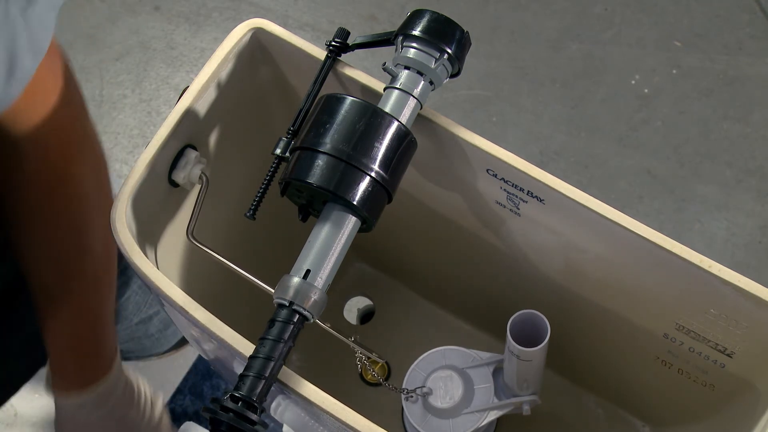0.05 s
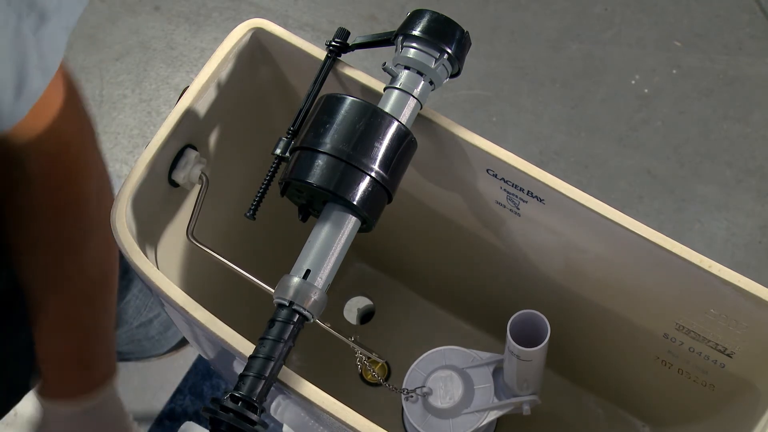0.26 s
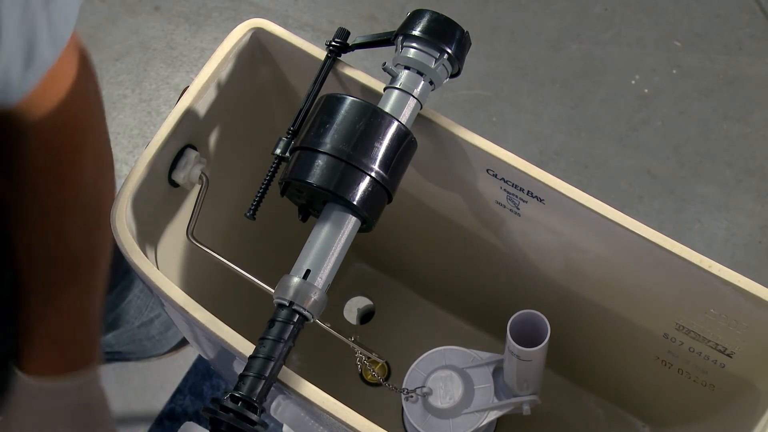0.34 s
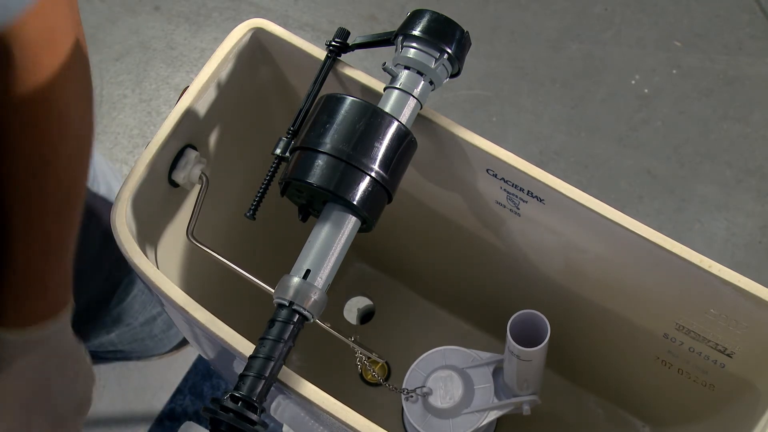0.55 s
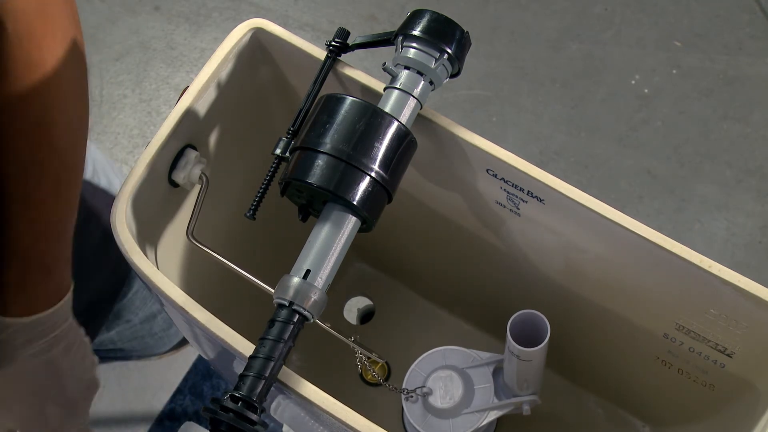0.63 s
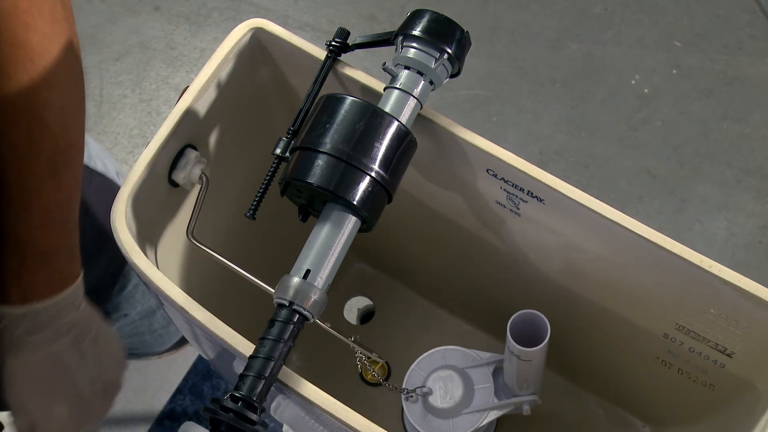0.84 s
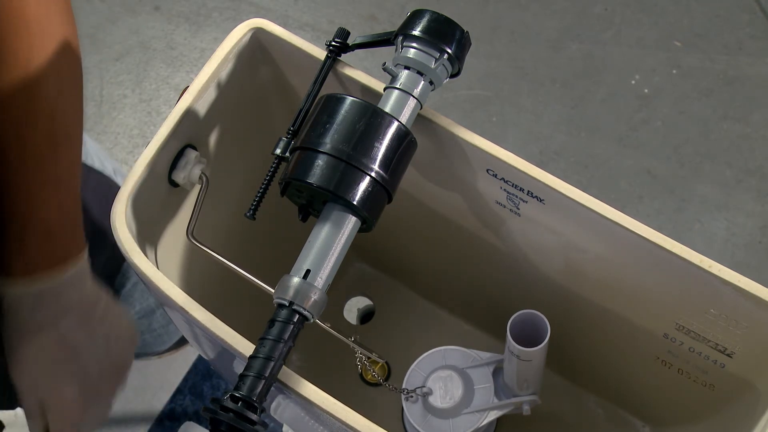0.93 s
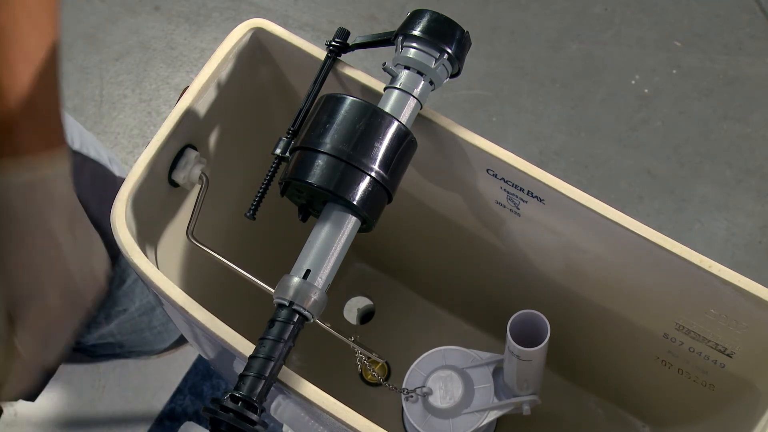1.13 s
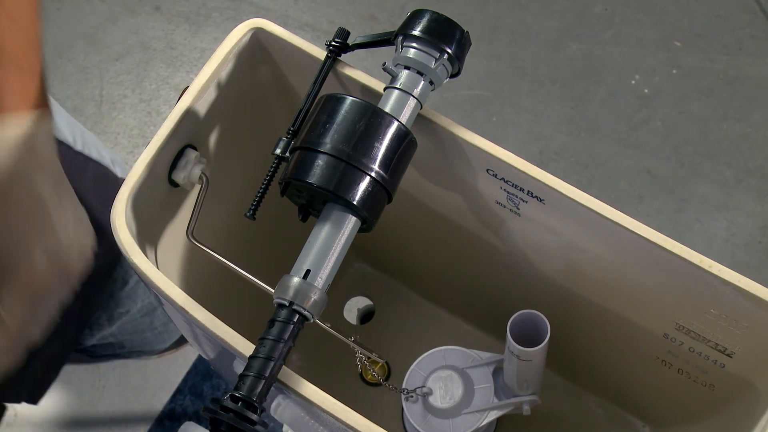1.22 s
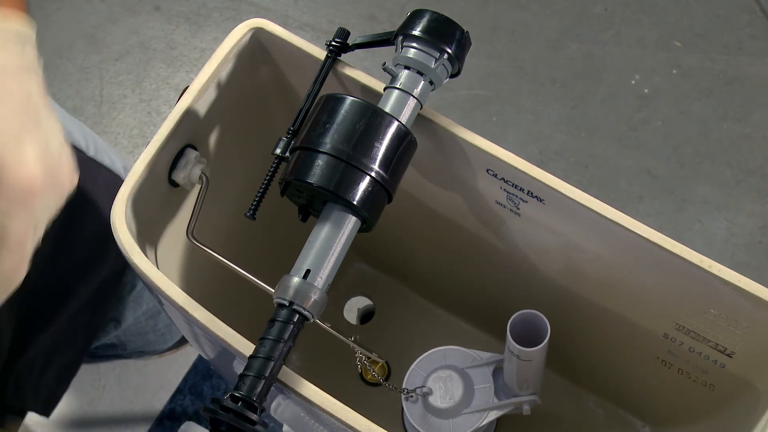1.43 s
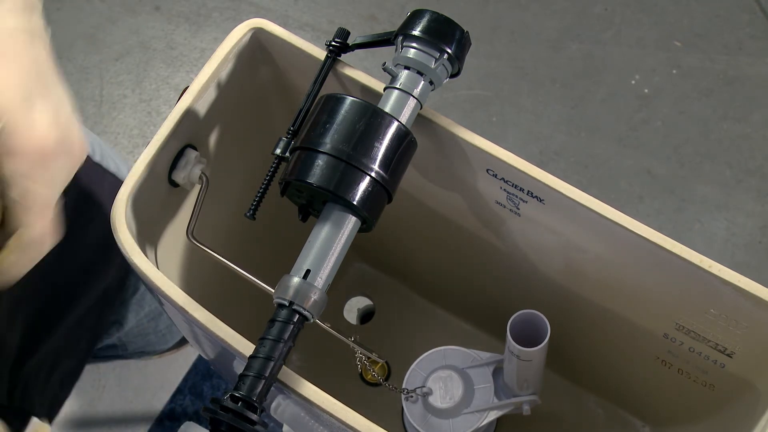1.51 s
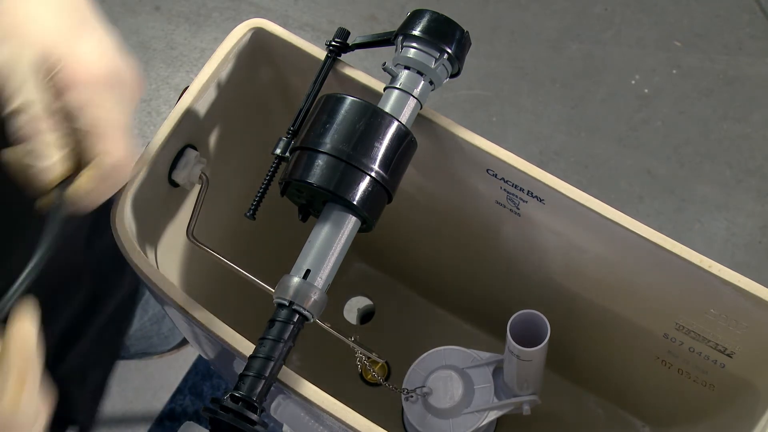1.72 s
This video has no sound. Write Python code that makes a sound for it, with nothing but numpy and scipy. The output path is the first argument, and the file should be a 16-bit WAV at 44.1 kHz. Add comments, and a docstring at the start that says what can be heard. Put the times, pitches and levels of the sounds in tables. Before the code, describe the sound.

A heavy toilet tank lid clunks onto a concrete floor and chatters briefly to rest.

```python
"""A faint shuffle over a low hum, then a heavy, hard piece, probably the lid, meets the concrete floor
beside an open toilet tank. One edge lands, the other follows with a clunk, and it chatters to rest.
Each contact sounds the hollow body, the hard shell and the grit beneath; the body rings briefly in the
workshop. Then a sleeve rustles and a few small taps reach the one microphone, with a faint high
chirping far off."""
import sys
import numpy as np
from scipy import signal
from scipy.fft import rfft, irfft
from scipy.io import wavfile

SR = 44100
rng = np.random.default_rng(int(sys.argv[2]) if len(sys.argv) > 2 else 0)


def to_wav(s):
    """Save 16-bit WAV."""
    ch = np.atleast_2d(s).T  # columns
    pcm = np.round(np.clip(ch, -1, 1) * 32767)  # PCM
    wavfile.write(sys.argv[1], SR, pcm.astype(np.int16))


N = 77175
TIME = np.arange(N) / SR

# colour of the room air: f/Hz, level/dB
AIR_COLOUR = [(15, -11), (26, -8), (36, 13.5), (55, 5), (110, 4.5), (182, -3.5), (277, -7.5), (485, -13),
              (740, -12), (1220, -22.5), (1760, -22), (2750, -50), (11100, -59), (16000, -49)]
# tones of the hum: f/Hz, level/dB
HUM_TONES = [(86.1, -71), (118.4, -67), (176.5, -68), (235.5, -74)]
# hiss of the sleeve: t/s, level/dB
SLEEVE_ENVELOPE = [(0, -67), (.2, -70.5), (.72, -71), (.85, -66.5), (1.1, -67.5), (1.3, -68), (1.5, -65),
                   (1.62, -67), (1.75, -68.5)]
# its colour: f/Hz, level/dB
SLEEVE_COLOUR = [(1000, 3.5), (3000, 5.5), (6000, 4), (11000, 8), (16000, -2)]
# the person shifts: t/s, level/dB
SHUFFLE_ENVELOPE = [(0, -52), (.11, -55), (.17, -66), (.25, -100), (1.0, -75.5), (1.35, -89), (1.55, -66),
                    (1.75, -93)]
# its colour: f/Hz, level/dB
SHUFFLE_COLOUR = [(120, 9.5), (300, -2), (500, 4.5), (850, 3), (1300, -10), (3000, -17.5), (8000, -25)]
# the arm draws back along the clothes: t/s, level/dB
RUB_ENVELOPE = [(0, -78.5), (1.38, -72), (1.5, -64.5), (1.62, -65.5), (1.75, -68.5)]
# its colour: f/Hz, level/dB
RUB_COLOUR = [(500, -1), (1000, 11.5), (1800, 9.5), (3500, 4.5), (7000, 0.5), (14000, -58)]
# scuffs and ticks of handling: t/s, level/dB, centre f/Hz, width/octaves, t60/s
SCUFFS = [(0.108, -50.5, 795, 0.5, 0.035), (0.8301, -45.5, 6040, 0.74, 0.0044),
          (0.838, -62, 7000, .8, 0.0045), (1.0764, -48, 4380, 0.33, 0.012), (1.076, -56, 1390, 0.43, 0.036),
          (1.0767, -54.5, 447, 0.32, 0.032), (1.138, -60, 1260, 1.33, 0.11),
          (1.2885, -44, 9300, 0.78, 0.0046), (1.4837, -43, 9400, 1, 0.0053),
          (1.6500, -49.5, 2020, 0.38, .03), (1.6735, -49, 2400, .7, 0.0041)]
# the lid meets the floor: t/s, hollow thud/dB, shell clink/dB, hard clack/dB, gritty tick/dB
FLOOR_CONTACTS = [(0.2373, -17.5, -17, -61, -29), (0.2467, -23.5, -31.5, -31.5, -28.5),
                  (0.2557, -44, -28, -25, -50), (0.2580, -32.5, -33, -27.5, -34),
                  (0.2643, -39, -27, -36, -46), (0.2796, -23, -23, -15, -21.5),
                  (0.2827, -15.5, -25, -31, -30), (0.2867, -13, -23.5, -34, -44),
                  (0.3035, -39, -34, -32, -14.5), (0.3053, -27, -31, -55, -21.5),
                  (0.308, -27, -25.5, -42, -30), (0.3333, -35.5, -22.5, -34, -55),
                  (0.3363, -42, -37, -51, -31.5), (0.3602, -30, -45, -35, -33),
                  (0.41, -48, -54, -48, -35.5), (0.422, -57, -61, -60, -50), (0.452, -34, -43.5, -41, -50),
                  (0.5520, -56.5, -76, -52.5, -45), (0.5976, -56.5, -77, -71, -44.5)]
# broad resonances of the hollow body: f/Hz, level/dB, t60/s
THUD_MODES = [(216.7, -18, 0.1), (452, -7, 0.03), (582, -15.5, 0.086), (624, 1.5, 0.018),
              (826, -15.5, 0.06)]
# bright modes of the hard shell: f/Hz, level/dB, t60/s
SHELL_MODES = [(1700, -30.5, 0.03), (1680, -19.5, 0.051), (1730, -24, 0.2), (1880, -27.5, 0.048),
               (2604, -18.5, 0.038), (2930, -18.5, 0.025), (3090, -21.5, 0.013), (4100, -29, 0.03)]
# colour of the clack on concrete: f/Hz, level/dB
CLACK_COLOUR = [(700, -7.5), (1150, 6), (1700, 5.5), (2250, -1.5), (2900, 3.5), (4300, 1), (6000, -10.5),
                (10000, -17.5), (16000, -27)]
# colour of the grit's tick: f/Hz, level/dB
GRIT_COLOUR = [(1500, 6), (3000, -2), (4800, 4), (6700, 0.5), (7900, -9.5), (9700, -7.5), (12500, -13.5),
               (16000, -36)]
# narrow modes of the tank's cavity and walls, ringing on in sympathy: f/Hz, level/dB, t60/s
RING_MODES = [(130, -40.5, 1), (204.4, -35, 0.97), (289, -35, 0.2), (315, -28, 0.57), (346.3, -30, 0.64),
              (437.5, -23, 0.6), (503, -32.5, 0.36), (529.8, -25.5, .45), (550, -37, 0.182),
              (596, -42.5, 0.55), (651.4, -28.5, 0.26), (686, -38, 0.8), (760, -37, 0.43), (853, -40, .4)]
# reverberation of the workshop: f/Hz, level/dB, t60/s
ROOM_DECAY = [(70, 0, 0.52), (128, 1, 1), (253, -1, 0.68), (409, -1, 0.56), (680, -5, 0.31),
              (1114, -3.5, 0.5), (2050, -12.5, .42), (4440, -19.5, 0.87), (9000, -17, 0.9),
              (15100, -14, 0.28)]
# light knocks of one pitch: t/s, level/dB, f/Hz, t60/s
LIGHT_KNOCKS = [(0.315, -28.5, 111.7, 0.077), (1.0765, -50, 4400, 0.017), (1.155, -53.5, 525, 0.042),
                (1.290, -40.5, 222, 0.032), (1.651, -38, 2080, 0.012), (1.6565, -47, 2500, 0.011)]
# distant chirps: t/s, length/s, start f/Hz, end f/Hz
FAR_CHIRPS = [(0.955, 0.043, 4450, 4620), (1.021, 0.072, 4480, 4200), (1.091, 0.047, 4650, 4180)]


def from_db(db):
    """Decibels to gain."""
    return 10 ** (np.asarray(db) / 20)


def rms_one(x):
    """Scale to unit power."""
    return x / np.sqrt(np.mean(x ** 2) + 1e-20)


def at_hz(points, hz, column=1):
    """Read a column of a table on a log-frequency axis."""
    table = np.array(points)
    return np.interp(np.log(np.maximum(hz, 1)), np.log(table[:, 0]), table[:, column])


def noise(colour, size=N):
    """Noise of a given colour, unit power."""
    hz = np.arange(size // 2 + 1) * SR / size
    phases = np.exp(2j * np.pi * rng.random(len(hz)))
    return rms_one(irfft(from_db(at_hz(colour, hz)) * phases, size))


def drift(hz):
    """Random wander of unit power, mostly slower than hz."""
    return noise([(hz, 0), (hz * 10, -60)])


def dying(t60, size=N):
    """Exponential decay, 60 dB down after t60 seconds."""
    return np.exp(-np.log(1000) * TIME[:size] / max(t60, 1e-4))


def add(out, s, sound):
    """Mix a sound in at s seconds."""
    i = max(int(s * SR), 0)
    out[i:i + len(sound)] += sound[:max(N - i, 0)]


def filtered(x, kind, hz, order):
    """Butterworth filter."""
    return signal.sosfilt(signal.butter(order, hz, kind, fs=SR, output="sos"), x)


def modes(table):
    """Decaying sines set off by one blow."""
    return sum(from_db(db) * dying(t60) * np.sin(2 * np.pi * hz * TIME) for hz, db, t60 in table)


def room_tone(air_db=-60, waver_rad=0.17):
    """Low room air and a hum whose tones waver in phase."""
    out = from_db(air_db) * noise(AIR_COLOUR)
    for hz, db in HUM_TONES:
        out += from_db(db) * np.sqrt(2) * np.sin(2 * np.pi * hz * TIME + waver_rad * drift(4))
    return out


def cloth(envelope, colour, grain_hz, grain_db=2.5):
    """Rubbing cloth: noise that catches and slips."""
    level = from_db(np.interp(TIME, *np.transpose(envelope)))
    return noise(colour) * level * rms_one(from_db(grain_db * drift(grain_hz)))


def scuffs():
    """Handling scuffs and ticks: short bursts of noise, each around one frequency."""
    out = np.zeros(N)
    for s, db, hz, octaves, t60 in SCUFFS:
        colour = [(hz * 2 ** (k * octaves), -4 * k * k) for k in range(-3, 4)]
        fade = dying(t60, size=8192)
        burst = rms_one(noise(colour, size=8192) * fade)
        add(out, s, from_db(db) * burst * np.sqrt(np.mean(fade ** 2)))
    return out


def snap(colour, size=1024):
    """The pressure pulse that opens a crack: the shortest of its colour (minimum phase), height 1."""
    hz = np.arange(size // 2 + 1) * SR / size
    cepstrum = irfft(np.log(from_db(at_hz(colour, hz))))
    causal = 2 * cepstrum * (np.arange(size) < size // 2)
    pulse = irfft(np.exp(rfft(causal)))
    return pulse / np.abs(pulse).max()


def crack(colour, t60, wash_t60, wash_db, snap_db=-6.5, size=8192):
    """A hard contact: a snap, a very short burst and a weaker wash of dense high modes."""
    envelope = 0.5 * dying(t60, size) + from_db(wash_db) * dying(wash_t60, size)
    out = noise(colour, size) * envelope
    add(out, 0, from_db(snap_db) * snap(colour))
    return out


def lid_clatter():
    """At each contact the shell clinks, clacks on the concrete and ticks on the grit."""
    out = np.zeros(N)
    clink = filtered(modes(SHELL_MODES), "high", hz=1485, order=3)
    for s, _, clink_db, clack_db, tick_db in FLOOR_CONTACTS:
        add(out, s, from_db(clink_db) * clink)
        add(out, s, from_db(clack_db) * crack(CLACK_COLOUR, t60=0.0027, wash_t60=0.052, wash_db=-14.5))
        add(out, s, from_db(tick_db) * crack(GRIT_COLOUR, t60=0.0021, wash_t60=0.036, wash_db=-20))
    return out


def lid_thud(blows):
    """The hollow body answers each blow, radiating little bass and little treble."""
    thud = filtered(modes(THUD_MODES), "high", hz=213, order=2)
    thud = filtered(thud, "low", hz=907, order=6)
    return signal.fftconvolve(blows, thud)[:N]


def tank_ring(blows, build_s=0.012, flutter_db=3.5, flutter_hz=22.3):
    """Each blow tops up the energy of the tank's narrow modes, which ring in sympathy and flutter as they die."""
    out = np.zeros(N)
    step = 1 - np.exp(-1 / (build_s * SR))
    fed = signal.lfilter([step], [1, step - 1], blows ** 2 + 1e-18)
    for hz, db, t60 in RING_MODES:
        kept_per_sample = from_db(-60 / (t60 * SR)) ** 2
        energy = signal.lfilter([1], [1, -kept_per_sample], fed)
        gain = from_db(db + flutter_db * drift(flutter_hz))
        out += gain * np.sqrt(energy) * np.sin(2 * np.pi * (hz * TIME + rng.random()))
    return out


def workshop(x, delay_s=0.006, build_s=0.0061):
    """Diffuse reverberation reaches the microphone just after the direct sound and dies band by band."""
    edges_hz, tail = np.geomspace(45, 17000, 18), np.zeros(N)
    white = [noise([(1, 0), (SR, 0)]) for _ in range(2)]
    build = 1 - np.exp(-TIME / build_s)
    for k, (low, high) in enumerate(zip(edges_hz, edges_hz[1:])):
        hz = np.sqrt(low * high)
        band = filtered(white[k % 2], "band", [low, high], order=2)
        band = rms_one(band * dying(at_hz(ROOM_DECAY, hz, column=2)) * build)
        width_gain = np.sqrt(2 * (high - low) / SR / N)
        add(tail, delay_s, from_db(at_hz(ROOM_DECAY, hz)) * width_gain * band)
    return signal.fftconvolve(x, tail)[:N]


def light_knocks(rise_cycles=4.6):
    """Each light knock sounds one mode with a softened onset."""
    out = np.zeros(N)
    for s, db, hz, t60 in LIGHT_KNOCKS:
        add(out, s, modes([(hz, db, t60)]) * (1 - dying(rise_cycles / hz)))
    return out


def far_chirps(level_db=-70):
    """Three faint, high gliding tones, far from the microphone."""
    out = np.zeros(N)
    for s, length, start_hz, end_hz in FAR_CHIRPS:
        glide_hz = np.linspace(start_hz, end_hz, int(length * SR))
        tone = np.sin(2 * np.pi * np.cumsum(glide_hz) / SR)
        add(out, s, from_db(level_db) * np.hanning(len(tone)) * tone)
    return out


def scene():
    """The lid and the handling in the workshop, over cloth, room tone and chirps, in mono."""
    blows = np.zeros(N)
    for s, thud_db, *_ in FLOOR_CONTACTS:
        add(blows, s, from_db([thud_db]))
    clunk = lid_clatter() + lid_thud(blows)
    ring = tank_ring(blows)
    handling = scuffs() + light_knocks()
    clothes = (cloth(SLEEVE_ENVELOPE, SLEEVE_COLOUR, grain_hz=152)
               + cloth(SHUFFLE_ENVELOPE, SHUFFLE_COLOUR, grain_hz=42.6)
               + cloth(RUB_ENVELOPE, RUB_COLOUR, grain_hz=97))
    reverb = workshop(clunk + from_db(-3) * handling)
    return (clunk + ring + handling + reverb + clothes + room_tone() + far_chirps())[None]


def record(dry, cutoff_hz=15900):
    """A steep low-pass cuts the top of the microphone signal."""
    return signal.sosfilt(signal.ellip(10, 0.1, 70, cutoff_hz, fs=SR, output="sos"), dry)


dry = scene()
out = record(dry)
to_wav(out)
```